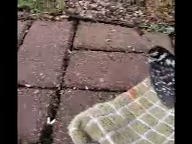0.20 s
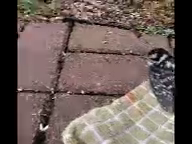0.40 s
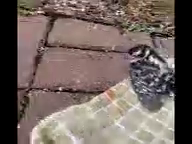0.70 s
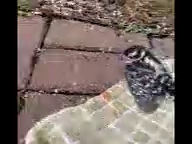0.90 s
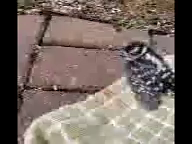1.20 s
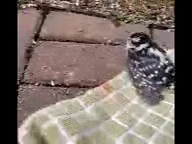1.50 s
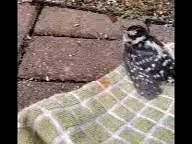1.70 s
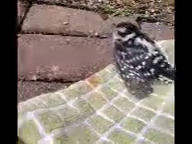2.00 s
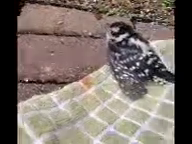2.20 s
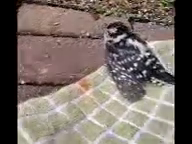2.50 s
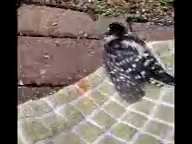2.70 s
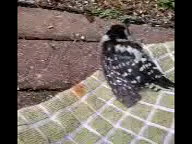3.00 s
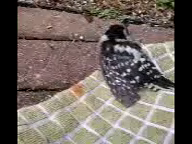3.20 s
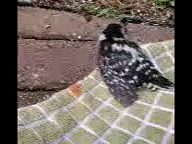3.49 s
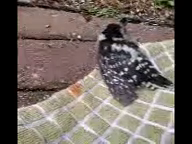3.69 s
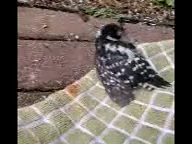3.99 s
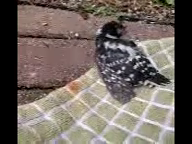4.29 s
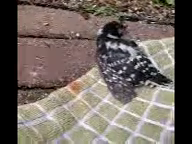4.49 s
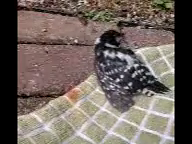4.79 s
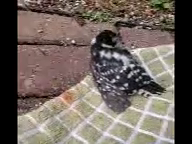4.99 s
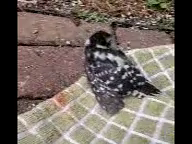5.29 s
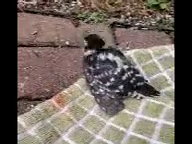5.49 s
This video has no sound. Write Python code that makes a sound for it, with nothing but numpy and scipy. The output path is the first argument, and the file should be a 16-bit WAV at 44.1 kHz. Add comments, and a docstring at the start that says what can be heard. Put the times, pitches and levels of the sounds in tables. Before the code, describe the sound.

At about 0.1 seconds a hand scuffs, bumps and grips a phone, making low thumps and a rumble that are the loudest sounds and ease by 0.4 seconds. A light breeze then rumbles on the microphone throughout, with soft irregular buffets, over distant traffic and a very faint hiss of leaves. From the start until about 3.1 seconds a bird gives a run of high rising whistles, about five a second, each cracking into a raspy peep and growing more insistent. A young woodpecker close by gives three short nasal squawks at 2.2, 2.4 and 3.0 seconds, its voice breaking hoarsely in each. A far engine's low drone swells near 2.9 seconds and fades by 4.5. From 3.1 to 4.8 seconds a songbird further off sings quieter, short sliding notes. The birds echo lightly around the garden. Breeze and traffic continue until about 5.6 seconds.

```python
"""A hand-held phone is bumped and gripped in a garden; then a light breeze rumbles and softly buffets its
microphone, over distant traffic and faint leaves. From the start a bird gives a quick run of rising
whistles, ever more insistent. From 2.2 s a young woodpecker on the patio gives three nasal squawks, its
voice breaking in each, while a far engine swells. From 3.1 s a songbird sings short sliding notes
further off. Trees and walls echo all the birds."""
import sys
import numpy as np
from scipy import signal
from scipy.fft import rfft, irfft
from scipy.io import wavfile
from scipy.ndimage import uniform_filter1d

SR = 44100
rng = np.random.default_rng(int(sys.argv[2]) if len(sys.argv) > 2 else 0)


def store_pcm(level_fs):
    """Save levels as 16-bit WAV."""
    pcm = np.round(np.clip(level_fs, -1, 1) * 32767).astype(np.int16)
    wavfile.write(sys.argv[1], SR, np.atleast_2d(pcm).T)


N = 246959
TIME = np.arange(N) / SR

# the slow swell of the outdoor background: time_s, traffic_db, leaves_db
BACKGROUND_LEVELS = [(.3, -62, -73.5), (1.3, -61.5, -75), (2.0, -57.5, -72), (3.1, -58, -72.5),
                     (3.9, -57, -73.5), (4.6, -60, -73), (5.6, -59.5, -73.5)]
# the tone of moving air on the microphone: frequency_hz, level_db
WIND_SPECTRUM = [(20, -20.5), (35, -3), (65, -0.5), (95, 1.5), (140, -10), (220, -12.5), (330, -28),
                 (500, -32), (1000, -73.5)]


def undb(db):
    """Turn decibels into a factor to multiply by."""
    return 10 ** (np.asarray(db) / 20)


def unit(x):
    """Scale a sound to an average strength (rms) of 1."""
    return x / np.sqrt(np.mean(x ** 2) + 1e-20)


def curve(rows, at, column=1):
    """Read a table column, joining its points with straight lines."""
    rows = np.asarray(rows, float)
    return np.interp(at, rows[:, 0], rows[:, column])


def gain_at(spectrum, hz):
    """How strongly a spectrum table lets these frequencies through."""
    table_hz, db = np.transpose(spectrum)
    return undb(np.interp(np.log(np.maximum(hz, 1)), np.log(table_hz), db))


def noise(spectrum):
    """Noise of strength 1 with the tone of a spectrum table."""
    hz = np.arange(N // 2 + 1) * SR / N
    return unit(irfft(rfft(rng.standard_normal(N)) * gain_at(spectrum, hz), N))


def band(x, low_hz, high_hz, order=2):
    """Keep what lies between two frequencies."""
    edges_hz = [low_hz, min(high_hz, SR / 2 - 1)]
    return signal.sosfilt(signal.butter(order, edges_hz, "band", fs=SR, output="sos"), x)


def wobble(per_s, size=N):
    """A random drift of roughly 1 either way that turns per_s times a second."""
    step = max(int(SR / per_s), 1)
    return uniform_filter1d(np.repeat(rng.standard_normal(size // step + 1), step), step)[:size]


def add(out, start_s, x):
    """Mix x into out at a given time."""
    i = max(int(start_s * SR), 0)
    out[i:i + len(x)] += x[:max(N - i, 0)]


def soften(x, fade_samples=130):
    """Round off both ends of a note."""
    edge = np.minimum(np.arange(len(x)), np.arange(len(x))[::-1])
    return x * np.sin(np.pi / 2 * np.minimum(edge / fade_samples, 1)) ** 2


def swish(length_s, low_hz, high_hz):
    """A short hiss that swells and fades."""
    size = int(length_s * SR)
    return unit(band(rng.standard_normal(size), low_hz, high_hz) * np.hanning(size))


def leaves(flicker_db=.8):
    """Leaves hiss faintly, with a swish or tick in the garden litter now and then."""
    leaf_spectrum = [(2000, -17.5), (3000, 0.5), (4000, 2), (5200, -3.5), (6100, -7.5), (7200, -5.5),
                     (8800, -9), (9700, -34.5)]  # tone of the hiss: frequency_hz, level_db
    rustles = [(0.558, .11, -76, 6500, 9300), (3.74, 0.29, -70, 3400, 5000), (4.69, .012, -71, 6500, 9000)]  # swishes and ticks: start_s, length_s, level_db, low_hz, high_hz
    hiss = noise(leaf_spectrum)
    hiss /= np.std(band(hiss, 4690, 7500))  # the level is set for this band
    out = hiss * undb(curve(BACKGROUND_LEVELS, TIME, column=2) + flicker_db * wobble(25))
    for start_s, length_s, db, low_hz, high_hz in rustles:
        add(out, start_s, undb(db) * swish(length_s, low_hz, high_hz))
    return out


def traffic(engine_hz=98.1, wander=.0332, overtone_db=-16, flicker_db=1.72, throb_db=2.5):
    """Far traffic blends into a wash of noise, with the wavering drone of one engine."""
    wash_spectrum = [(40, -13.5), (130, -3), (260, 4.5), (340, -3), (420, 0.5), (560, -3.5), (850, -0.5),
                     (1400, -7), (2200, -14), (3200, -17.5), (5000, -41)]  # tone of the wash: frequency_hz, level_db
    engine_levels = [(0, -66), (1.9, -71.5), (2.3, -56.5), (2.9, -42), (3.3, -49.5), (3.9, -45), (4.5, -55),
                     (4.8, -58), (5.6, -61)]  # the engine swells and fades: time_s, level_db
    wash = noise(wash_spectrum)
    wash /= np.std(band(wash, 595, 1130))  # the level is set for this band
    wash *= undb(curve(BACKGROUND_LEVELS, TIME) + flicker_db * wobble(10))
    phase = 2 * np.pi * np.cumsum(engine_hz * (1 + wander * wobble(12))) / SR
    drone = unit(np.sin(phase) + undb(overtone_db) * np.sin(2 * phase))
    return wash + drone * undb(curve(engine_levels, TIME) + throb_db * wobble(20))


def breeze(flutter_db=2.0):
    """Swirls of air rumble on the microphone."""
    gusts = [(.3, -39), (.5, -50), (.85, -41.5), (1.0, -48.5), (1.45, -45.5), (2.2, -43), (2.95, -41),
             (3.4, -44.5), (4.4, -42.5), (5.6, -43.5)]  # strength of the breeze: time_s, level_db
    return noise(WIND_SPECTRUM) * undb(curve(gusts, TIME) + flutter_db * wobble(18))


def bass_dips(x, below_hz=273, steepness=6):
    """The bass drops away for a few brief moments."""
    dips = [(1.289, 0.07, -18), (1.777, 0.15, -31), (2.015, 0.058, -14), (2.877, 0.031, -23),
            (3.035, 0.049, -22), (4.705, 0.058, -20)]  # gaps in the bass: middle_s, length_s, depth_db
    dip_db = sum(db * np.exp(-np.abs(2 * (TIME - middle_s) / length_s) ** steepness)
                 for middle_s, length_s, db in dips)
    bass = signal.sosfiltfilt(signal.butter(2, below_hz, fs=SR, output="sos"), x)
    return x + bass * (undb(dip_db) - 1)


def low_thump(push_s):
    """One soft push from a hand or the air thumps at the microphone; a longer push sounds duller."""
    case_tones = [(62, -21.5, 0.058), (86.1, -3, 0.086), (116, -5.5, 0.1), (159.3, -5.5, 0.055),
                  (212, -7, 0.033), (288, -9.5, 0.02), (340, -7.5, 0.025), (437, -25.5, 0.012),
                  (820, -21.5, 0.013)]  # how hand and case ring: pitch_hz, level_db, fade_s (to fall 60 dB)
    t = np.arange(SR // 5) / SR
    ring = sum(undb(db - 60 * t / fade_s) * np.sin(2 * np.pi * hz * t) for hz, db, fade_s in case_tones)
    thump = signal.fftconvolve(ring, np.hanning(int(push_s * SR) + 2))
    return -thump / np.abs(thump).max()


def microphone_thumps(hiss_db=-40, hiss_fade_s=.17):
    """Fingers scuff and knock the phone at first; later the breeze softly buffets the microphone."""
    # low thumps on the microphone, handling knocks first, then buffets of breeze: start_s, peak_db, push_s
    thumps = [(.127, -6, 0.005), (.207, -4.5, 0.0016), (.238, -9.5, 0.0023), (0.275, -14, 0.0079),
              (0.508, -23.5, 0.0083), (0.701, -21.5, 0.0032), (.738, -28, 0.011), (.826, -29.5, 0.0047),
              (0.853, -28.5, 0.0041), (1.515, -32.5, 0.0023), (1.547, -31, .006), (1.87, -31.5, 0.009),
              (1.941, -26.5, 0.0093), (2.083, -30.5, 0.0088), (2.143, -30, 0.011), (2.197, -28.5, 0.011),
              (2.437, -27, 0.008), (2.778, -29, .009), (2.844, -22, 0.007), (2.946, -26.5, 0.0074),
              (3.134, -27, 0.012), (3.895, -29.5, .007), (4.425, -28, 0.0084), (4.867, -31.5, 0.0059)]
    scuffs = [(0.072, 0.03, -54), (0.085, 0.046, -48.5)]  # finger scrapes: start_s, length_s, level_db
    out, t = np.zeros(N), np.arange(SR // 5) / SR
    for start_s, db, push_s in thumps:
        add(out, start_s, undb(db) * low_thump(push_s))
        hiss = unit(band(rng.standard_normal(len(t)), 610, 990))
        add(out, start_s, hiss * undb(db + hiss_db - 60 * t / hiss_fade_s))
    for start_s, length_s, db in scuffs:
        add(out, start_s, undb(db) * swish(length_s, 1500, 4200))
    return out


def grip(start_s=.108, level_db=-18, ease_db_per_s=-37.5, slips_per_s=440, rumble_db=-2, rub_db=-38):
    """The shifting hand sticks and slips on the case, rubs it and stirs the air at the microphone."""
    swell_s, hold_s, release_s = .0075, .18, .035
    out, t = np.zeros(N), np.arange(SR // 3) / SR
    slips = (rng.random(len(t)) < slips_per_s / SR) * np.sign(rng.standard_normal(len(t)))
    shudder = unit(signal.fftconvolve(slips, low_thump(push_s=.0037))[:len(t)])
    rumble = undb(rumble_db) * unit(noise(WIND_SPECTRUM)[:len(t)])
    rub = undb(rub_db) * unit(band(rng.standard_normal(len(t)), 600, 1500))
    held = np.interp(t, np.cumsum([0, swell_s, hold_s, release_s]), [0, 1, 1, 0])
    add(out, start_s, (shudder + rumble + rub) * held * undb(level_db + ease_db_per_s * t))
    return out


def garden_echo(x, early_db, early_s, late_db, late_s, gap_s=.0038):
    """Walls and paving echo quickly, trees add a long tail; they fall 60 dB in early_s and late_s."""
    t = np.arange(SR) / SR
    early, late = rng.standard_normal((2, SR)) * np.clip(t / gap_s - 1, 0, 1)
    walls = undb(early_db) * unit(early * undb(-60 * t / early_s))
    trees = undb(late_db) * unit(late * undb(-60 * t / late_s))
    return x + signal.fftconvolve(x, (walls + trees) / np.sqrt(SR))[:N]


def ground_bounce(x, bounce_gain=.069, delay_s=.0024, scatter_db=-4, fade_s=.04):
    """Sound bounces off the ground and scatters from things nearby, which ripples each whistle."""
    bounce = bounce_gain * np.pad(x, (int(delay_s * SR), 0))[:N]
    t = np.arange(SR // 10) / SR
    scatter = unit(rng.standard_normal(len(t)) * undb(-60 * t / fade_s)) / np.sqrt(len(t))
    return x + bounce + undb(scatter_db) * signal.fftconvolve(x, scatter)[:N]


def whistle(hz, waver, flutter_db=.55, overtone_db=-40):
    """A nearly pure tone whose pitch and strength waver."""
    phase = 2 * np.pi * np.cumsum(hz * (1 + waver * wobble(700, len(hz)))) / SR
    tone = np.sqrt(2) * (np.sin(phase) + undb(overtone_db) * np.sin(2 * phase))
    return soften(tone * undb(flutter_db * wobble(250, len(hz))))


def chirp(length_s, from_hz, to_hz, waver, fullness=0):
    """A short sliding note that swells and fades; fullness keeps it loud for longer."""
    progress = np.linspace(0, 1, int(length_s * SR))
    swell = np.abs(np.sin(np.pi * progress)) ** max(1 - fullness, 0)
    return whistle(from_hz + (to_hz - from_hz) * progress, waver) * swell


def songbird():
    """A far bird's sliding notes and a few soft echoes of them; a wider slide sounds rougher."""
    notes_and_echoes = [ (3.13, 0.075, 2600, 2242, -52), (3.21, 0.061, 2300, 2716, -53),
                        (3.245, 0.077, 2350, 2157, -56.5), (3.233, 0.063, 2930, 3300, -60),
                        (3.29, 0.031, 2724, 2490, -60), (3.318, 0.041, 2403, 2290, -55),
                        (3.612, 0.063, 2700, 3250, -57.5), (3.635, 0.037, 3480, 3600, -59.5),
                        (3.653, 0.051, 2690, 2626, -50), (3.697, 0.043, 3300, 2870, -54.5),
                        (3.736, 0.06, 2513, 2395, -50.5), (3.78, 0.037, 3210, 2870, -54),
                        (3.82, 0.031, 2456, 2415, -52.5), (4.09, 0.028, 2436, 2500, -57),
                        (4.11, 0.084, 2700, 3550, -52), (4.195, .036, 3105, 2843, -48),
                        (4.21, 0.032, 3315, 3530, -52.5), (4.222, 0.028, 2414, 2320, -52),
                        (4.266, 0.038, 3113, 2758, -49.5), (4.39, .035, 2870, 2860, -55),
                        (4.578, .045, 2416, 2476, -54), (4.61, 0.032, 3030, 3310, -59.5),
                        (4.63, 0.049, 2418, 2170, -57), (4.732, 0.048, 2240, 2280, -61)]  # start_s, length_s, from_hz, to_hz, level_db
    out = np.zeros(N)
    for start_s, length_s, from_hz, to_hz, db in notes_and_echoes:
        waver = .021 + .15 * abs(np.log(to_hz / from_hz))
        add(out, start_s, chirp(length_s, from_hz, to_hz, waver) * undb(db))
    return out


def whistling_bird(climb_hz_per_s=4000, peep_lead_s=.014, rasp_lead_s=.01793):
    """Each whistle sweeps up ever faster, cracks into a raspy high peep and slides down."""
    # the whistles: knee_s, level_db, top_hz, knee_hz, bend_s, peep_db, fall_db
    # (the knee is the loudest point of the rise; peep_db and fall_db add to level_db)
    calls = [ (.121, -41, 3536, 2170, .036, -6, -33), (.353, -47, 3510, 2195, 0.029, -6.5, -39),
             (0.556, -45, 3500, 2190, 0.026, -5, -22), (.781, -44, 3430, 2153, 0.016, -13, -12),
             (.996, -45, 3230, 2128, 0.017, -6, -12), (1.211, -44.5, 3200, 2182, 0.016, -18, -6.5),
             (1.425, -45.5, 3200, 2080, 0.014, -4.5, -4), (1.637, -44.5, 3210, 2150, 0.014, -7, -5.5),
             (1.843, -45.5, 3167, 2130, 0.017, -3.5, -1.5), (2.048, -43.5, 3180, 2118, 0.016, -3, -3),
             (2.250, -42, 3080, 2140, .017, -11.5, -11.5), (2.448, -41.5, 3020, 2120, .016, -8, -2),
             (2.655, -41, 3246, 2090, 0.0177, -7.5, -3), (2.854, -41, 3137, 2092, 0.019, -15, -6.5),
             (3.073, -39.5, 3193, 2147, .02, -12.5, -10)]
    rise_shape = [(-.06, -28.5), (-.043, -17.5), (-.028, -13), (-.014, -7), (0, 1.5), (.008, -2),
                  (.015, -6), (.024, -11)]  # loudness of the rise: time_from_knee_s, level_db
    fall_shape = [(-.004, 3200, -27.5), (.002, 3020, 4), (.010, 2660, 0.5), (.018, 2330, 3),
                  (.027, 2100, -28.5)]  # the closing slide: time_s, pitch_hz, level_db
    efforts = [(.1, 0.13), (.55, 0.28), (.78, 0.61), (1.4, .88), (3.1, 0.97)]  # the bird grows insistent: time_s, effort (0 to 1)
    slides, peeps = np.zeros(N), np.zeros(N)
    rise_t = np.arange(rise_shape[0][0], rise_shape[-1][0], 1 / SR)
    fall_t = np.arange(fall_shape[0][0], fall_shape[-1][0], 1 / SR)
    for knee_s, db, top_hz, knee_hz, bend_s, peep_db, fall_db in calls:
        effort = curve(efforts, knee_s)

        def by_effort(calm, insistent):
            """Blend a setting from calm to insistent."""
            return calm + effort * (insistent - calm)

        base_hz = by_effort(1994, 1755)
        ceiling_hz = top_hz * min(by_effort(.62, 1.08), 1)
        hz = base_hz + climb_hz_per_s * rise_t + (knee_hz - base_hz) * np.exp(rise_t / bend_s)
        rise = whistle(np.minimum(hz, ceiling_hz), waver=by_effort(.024, .036), flutter_db=2.3)
        shape_t = np.where(rise_t < 0, rise_t / by_effort(.87, .95), rise_t)  # shortens the soft start
        add(slides, knee_s + rise_t[0], rise * undb(db + curve(rise_shape, shape_t)))

        turn_s = knee_s + by_effort(.051, .026)  # the voice turns downward here
        fall = whistle(curve(fall_shape, fall_t), waver=.036) * undb(curve(fall_shape, fall_t, column=2))
        add(slides, turn_s + fall_t[0], fall * undb(db + fall_db))

        peep_s, sag = by_effort(.04, .038), by_effort(.032, .017)
        peep = chirp(peep_s, top_hz * (1 + sag), top_hz * (1 - sag), waver=.034, fullness=.2)
        add(peeps, turn_s - peep_lead_s, band(peep, 1960, top_hz + 170, order=12) * undb(db + peep_db))
        rasp = band(chirp(length_s=.056, from_hz=2900, to_hz=2900, waver=.11), 1940, top_hz, order=12)
        add(peeps, turn_s - rasp_lead_s, rasp * undb(db + by_effort(-23, -6)))
    return slides, peeps


def woodpecker(jitter=.039, hiss_db=-4.5, growl_db=-2, shimmer_db=1.6, stutter_db=2.4, break_span=.12):
    """The throat shapes a stack of overtones into a nasal squawk; the voice breaks and air hisses."""
    # the calls: start_s, length_s, pitch_hz, level_db, roughness (0 to 1), breaks_at (share of length)
    squawks = [(2.203, 0.12, 577.5, -44, 0.5, 0.57), (2.381, 0.11, 574.5, -43.5, 0.7, 0.5),
               (3.043, .11, 591, -44.5, 0.84, 0.36)]
    arch = [(0, .86, -9.5), (.12, 0.94, -2), (.25, 0.98, -1), (.45, 0.99, 0.5), (.65, 0.995, 3),
            (.88, 0.94, -0.5), (1, 0.88, -1)]  # course of one squawk: progress (0 to 1), pitch_ratio, level_db
    throat = [(550, -36.5), (1150, -19.5), (1700, 0), (2300, 2), (2850, -4.5), (3150, -16), (3450, -32),
              (3900, -22.5), (4600, -25), (5100, -34.5), (5700, -27.5), (7500, -45)]  # tone of the throat: frequency_hz, level_db
    breath = [(900, -41), (1500, -11), (2000, -3.5), (2400, 3), (3000, -6.5), (3400, -28), (3850, -19.5),
              (4600, -24), (5100, -33), (5700, -28), (7000, -49.5)]  # tone of hoarse air: frequency_hz, level_db
    out, hiss = np.zeros(N), noise(breath)
    harmonics = np.arange(1, 11)

    def stack(spectrum, multiples, hz, phase):
        """Tones at multiples of the pitch, each flickering on its own."""
        return unit(sum(gain_at(spectrum, k * hz) * np.sin(k * phase)
                        * undb(shimmer_db * wobble(170, len(hz))) for k in multiples))

    for start_s, length_s, pitch_hz, db, roughness, breaks_at in squawks:
        size = int(length_s * SR)
        progress = np.linspace(0, 1, size)
        breaking = np.clip((progress - breaks_at) / break_span + .5, 0, 1)
        hoarse = np.clip(roughness * breaking, .17, .95)  # even the clear start is a little rough
        hz = pitch_hz * curve(arch, progress) * (1 + jitter * hoarse * wobble(300, size))
        phase = 2 * np.pi * np.cumsum(hz) / SR
        voice = stack(throat, harmonics, hz, phase)
        # in a broken voice every other vibration differs, adding tones between the harmonics
        growl = stack(breath, harmonics + .5, hz, phase)
        puffs = unit(hiss[int(start_s * SR):][:size] * undb(4 * np.cos(phase / 2)))
        stutter = unit(undb(stutter_db * wobble(260, size)))
        broken = (undb(growl_db) * growl + undb(hiss_db) * puffs) * stutter
        call = np.sqrt(1 - hoarse ** 2) * voice + hoarse * broken
        add(out, start_s, soften(call) * undb(db + curve(arch, progress, column=2)))
    return out


def scene():
    """Birds at three distances, with leaves, traffic, breeze and the hand on the phone."""
    slides, peeps = whistling_bird()
    birds = garden_echo(ground_bounce(slides), early_db=-9, early_s=.39, late_db=-22.5, late_s=1.0)
    birds += garden_echo(peeps, early_db=-.5, early_s=.43, late_db=-10, late_s=1.0)
    birds += garden_echo(woodpecker(), early_db=-6, early_s=.12, late_db=-17.5, late_s=.9)
    birds += garden_echo(songbird(), early_db=-3.5, early_s=.39, late_db=-1, late_s=1.18)
    return (birds + grip() + leaves() + bass_dips(microphone_thumps() + breeze() + traffic()))[None]


def record(dry, opens_s=.078, low_cut_hz=32, high_cut_hz=9400):
    """The phone opens its microphone after a moment, thins the deepest bass and cuts the top treble."""
    opened = np.clip((TIME - opens_s) * 200, 0, 1)
    thinned = signal.sosfilt(signal.butter(4, low_cut_hz, "high", fs=SR, output="sos"), dry * opened)
    return signal.sosfilt(signal.ellip(8, .2, 70, high_cut_hz, fs=SR, output="sos"), thinned)


dry = scene()
out = record(dry)
store_pcm(out)
```